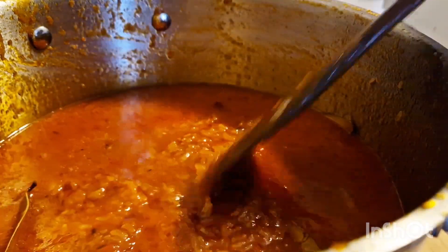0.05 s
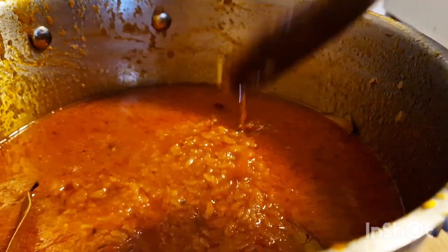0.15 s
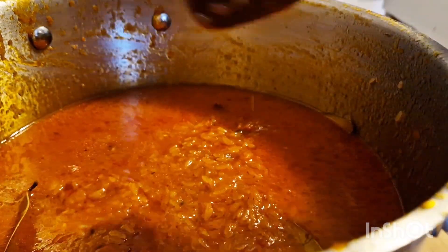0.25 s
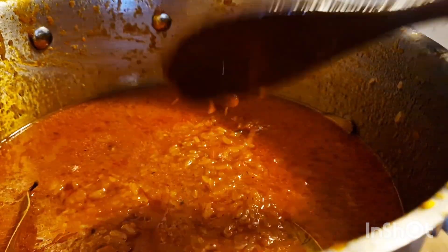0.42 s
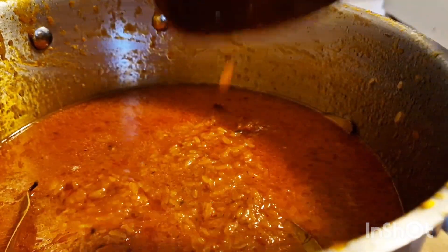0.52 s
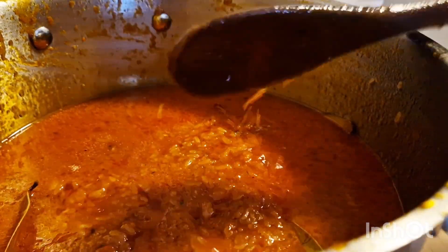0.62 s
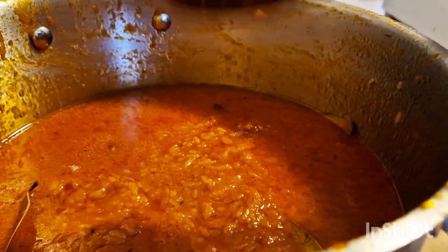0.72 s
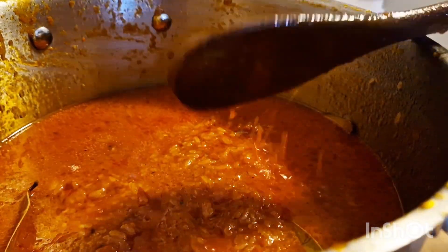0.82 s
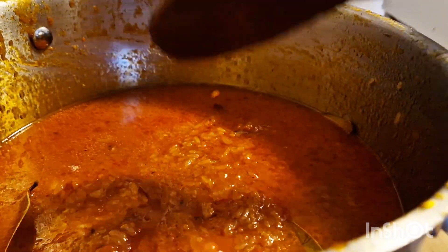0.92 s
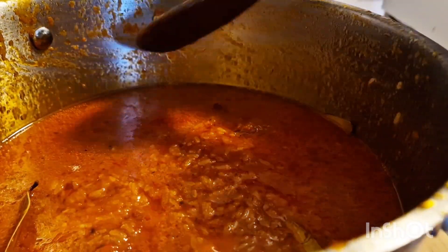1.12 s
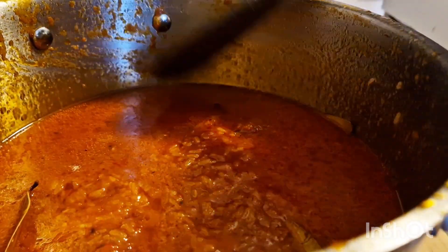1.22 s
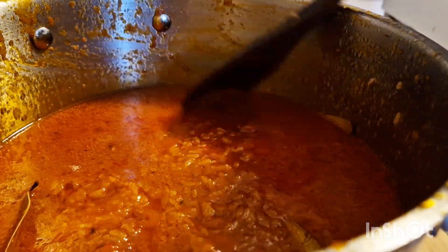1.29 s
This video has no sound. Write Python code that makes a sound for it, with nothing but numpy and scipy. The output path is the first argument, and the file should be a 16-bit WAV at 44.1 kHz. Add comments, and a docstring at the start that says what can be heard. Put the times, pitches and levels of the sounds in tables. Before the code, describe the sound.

Close stereo pickup in a small kitchen: three dry wood-on-steel clacks in quick succession, heavy and damped by the pot's wet contents, then near quiet with tiny bubbling plops, a brief gritty scrape and a dull bump.

```python
"""In a small kitchen, a wooden spoon knocks three times on the rim of a steel pot of wet rice, then bumps it softly.
Each knock is a dry clack and a short damped ring of decaying sines, a crack of shaped noise,
a thud of the full pot on the stove from slower-building modes, and a diffuse noise tail from the room.
Quiet plops of sauce are rising sines with noisy splats; sticky rice ticks are short bands of noise.
The spoon scrapes faintly along the wall as gritty noise, over a steady low-weighted kitchen hum."""
import sys
import numpy as np
from scipy import signal
from scipy.fft import rfft, irfft, next_fast_len
from scipy.io import wavfile
from scipy.ndimage import uniform_filter1d

SR = 44100
rng = np.random.default_rng(int(sys.argv[2]) if len(sys.argv) > 2 else 0)


def materialize(psi):
    """Save the field psi as 16-bit PCM at rate SR to the path in sys.argv[1].

    A 1-D psi becomes a single channel; in a 2-D psi each row is a channel.
    """
    bounded = np.clip(np.atleast_2d(psi).T, -1, 1)
    quanta = np.round(bounded * 32767).astype(np.int16)
    wavfile.write(sys.argv[1], SR, quanta)


N = 59535  # length in samples


def amp(db):
    """Decibels to gain."""
    return 10 ** (np.asarray(db) / 20)


def unit(x):
    """Scale to rms 1."""
    return x / np.sqrt(np.mean(x ** 2) + 1e-20)


def along(points, hz):
    """Read (Hz, value) points on a log frequency axis."""
    point_hz, value = np.transpose(points)
    return np.interp(np.log(hz + 1), np.log(point_hz + 1), value)


def clock():
    """Seconds at every sample."""
    return np.arange(N) / SR


def fade(t, t60_s):
    """Exponential decay by 60 dB in t60_s."""
    return np.exp(-np.log(1000) * t / t60_s)


def strike(t60_s, rise_s):
    """Envelope of a blow: an exponential build-up times an exponential decay."""
    return fade(clock(), t60_s) * (1 - np.exp(-clock() / rise_s))


def filtered(x, response):
    """Shape x by a gain that depends on frequency."""
    size = next_fast_len(N + SR // 2)  # padded so that the end does not wrap round
    hz = np.fft.rfftfreq(size, 1 / SR)
    return irfft(rfft(x, size) * response(hz), size)[..., :N]


def noise(spectrum, alike=((1000, 0),)):
    """Coloured stereo noise of rms 1; mid and side are balanced to give the left-right likeness."""
    def mid_side_gains(hz):
        turn = np.arccos(np.clip(along(alike, hz), -1, 1)) / 2
        return amp(along(spectrum, hz)) * [np.cos(turn), np.sin(turn)]

    mid, side = filtered(rng.standard_normal((2, N)), mid_side_gains)
    return unit(np.array([mid + side, mid - side]))


def band(centre_hz, width):
    """Stereo noise of rms 1 in one bell-shaped band, width in natural-log frequency."""
    def bell(hz):
        return np.exp(-.5 * (np.log((hz + 1) / centre_hz) / width) ** 2)

    return unit(filtered(rng.standard_normal((2, N)), bell))


def swing(modes, scatter_db):
    """Sum of damped sine modes, each with its own build-up and a random change of level."""
    total = 0
    for hz, db, t60_s, rise_s in modes:
        gain = amp(db + scatter_db * rng.normal())
        total = total + gain * strike(t60_s, rise_s) * np.sin(2 * np.pi * hz * clock())
    return total


def ring(modes, rise_s, scatter_db):
    """Damped modes that share one build-up time."""
    return swing([(*mode, rise_s) for mode in modes], scatter_db)


def add(out, start_s, x):
    """Mix x into out from start_s."""
    i = max(0, round(start_s * SR))
    out[..., i:] += x[..., :N - i]


def off_centre(x, lead_s):
    """The pot is nearer to the left microphone, so the right channel comes lead_s later."""
    return np.array([x, np.interp(clock() - lead_s, clock(), x, left=0)])


# the clack: the wooden spoon with the pot's quickly dying modes: pitch_hz, level_db, t60_s
CLACK = [(699, -39, 0.014), (1009, -16.5, .035), (1605, -2.5, 0.011), (1814, -14, 0.019),
         (2112, -16.5, 0.028), (2304, -9.5, 0.011), (3100, -34.5, 0.11), (3746, -27.5, .03)]
CLACK_RISE_S, SPOON_LEAD_S = 0.0014, 0.00013
# the steel wall, damped by the rice: pitch_hz, level_db, t60_s
WALL = [(533.5, -22.5, 0.11), (667, -34.5, 0.12), (709.6, -28, 0.17), (903, -32.5, 0.24), (971, -26, 0.15),
        (1078, -26.5, 0.23), (1110.6, -37.5, 0.25), (1254, -30.5, 0.079), (1606, -25.5, 0.22),
        (1870, -32.5, 0.139), (2020, -43, 0.166), (3050, -33, 0.091), (3700, -37, 0.083)]
WALL_RISE_S, WALL_LEAD_S, WALL_SCATTER_DB = .003, .00024, 1
# the steel rim at the point of contact: pitch_hz, level_db, t60_s
RIM = [(5140, -20, 0.017), (5560, -15.5, 0.018), (6086, -13, 0.012), (6514, -20.5, 0.017),
       (7466, -18.5, 0.0081)]
RIM_RISE_S, RIM_LEAD_S = 0.0004, 0.00012
# colour of the contact crack: frequency_hz, relative density_db (per Hz)
CRACK = [(400, 12), (1800, 0.5), (3300, 2), (4300, -11.5), (5300, 6), (6600, -4), (8000, -12), (10000, -30),
         (16000, -29.5)]
# stereo image of the crack: frequency_hz, left-right likeness (-1 to 1)
CRACK_ALIKE = [(1000, 0), (6000, 0.38)]
CRACK_DB, CRACK_T60_S, CRACK_RISE_S = -6.5, 0.011, 0.00046  # level against the rim
# near walls of the pot throw the crack back: level against the direct crack
SPLASH_DB, SPLASH_T60_S, SPLASH_RISE_S = 4, 0.01, 0.0035


def contact(clack_db, crack_db):
    """Wood meets steel: spoon and pot clack, the wall rings, the rim cracks and the crack scatters inside the
    pot."""
    clack = off_centre(ring(CLACK, CLACK_RISE_S, scatter_db=0.0), SPOON_LEAD_S)
    wall = off_centre(ring(WALL, WALL_RISE_S, WALL_SCATTER_DB), WALL_LEAD_S)
    direct = strike(CRACK_T60_S, CRACK_RISE_S)
    splash = amp(SPLASH_DB) * strike(SPLASH_T60_S, SPLASH_RISE_S)
    crack = noise(CRACK, CRACK_ALIKE) * (direct + splash)
    rim = off_centre(ring(RIM, RIM_RISE_S, scatter_db=3.5), RIM_LEAD_S)
    return amp(clack_db) * (clack + wall) + amp(crack_db) * (rim + amp(CRACK_DB) * crack)


# colour of the kitchen's answer: frequency_hz, relative density_db (per Hz)
ROOM = [(100, 10), (250, 5.5), (480, -0.5), (750, -3.5), (1080, 0.5), (1650, -3), (2200, -10),
        (2800, -17.5), (4200, -23), (5300, -15), (7200, -19), (9500, -29), (15500, -33)]
# how long the kitchen rings: frequency_hz, t60_s
ROOM_T60 = [(200, 0.37), (1200, .28), (3000, 0.29), (6500, 0.27), (12000, 0.23)]
# stereo image of the kitchen: frequency_hz, left-right likeness (-1 to 1)
ROOM_ALIKE = [(150, 0.78), (300, .5), (500, 0.52), (1000, -.15), (2500, 0.073), (9000, 0)]
ROOM_DB, ROOM_RISE_S = -16, 0.001


def kitchen():
    """The small room's diffuse tail: noise in which each frequency dies at its own speed."""
    hz, t, spectrogram = signal.stft(noise(ROOM, ROOM_ALIKE), SR, nperseg=256)
    decay = fade(t, along(ROOM_T60, hz)[:, None])
    tail = signal.istft(spectrogram * decay, SR)[1][:, :N]
    return amp(ROOM_DB) * tail * (1 - np.exp(-clock() / ROOM_RISE_S))


# the full pot on the stove: pitch_hz, level_db, t60_s, rise_s
BODY = [(69.2, -7.5, 0.44, 0.27), (90, -8.5, 0.33, 0.043), (147.1, -14.5, .19, 0.0023),
        (174.9, 2, 0.12, 0.046), (203, 3.5, 0.045, 0.0035), (193.2, -40.5, 0.85, 0.002),
        (244.2, -37.5, 0.11, 0.018), (259.8, -17, .125, .0017), (354.6, -4.5, 0.027, 0.00036),
        (405.4, -17.5, 0.17, 0.022), (472, -17.5, .09, 0.0004)]
BODY_LAG_S, BODY_PAN_DB = 0.0026, 0.07  # the thud trails the clack; pan is up left, down right


def thud():
    """The heavy pot moves on the stove in low modes, some of which build up slowly."""
    return amp([[BODY_PAN_DB], [-BODY_PAN_DB]]) * swing(BODY, scatter_db=1.2)


# knocks on the rim: start_s, level_db, clack_db and crack_db (both on top of the level)
KNOCKS = [(0.2031, -1.5, 4.5, -6.5), (.4290, -2.5, 3.5, -6), (0.6257, -3.38, 3.5, -0.5)]
ROOM_CHANGE = .3  # share of fresh tail against the shared one


def knocks():
    """Blows on one spot of the rim, so the room answers each almost alike."""
    out, shared_room = np.zeros((2, N)), kitchen()
    for start_s, level_db, clack_db, crack_db in KNOCKS:
        answer = (shared_room + ROOM_CHANGE * kitchen()) / np.hypot(1, ROOM_CHANGE)
        add(out, start_s, amp(level_db) * (contact(clack_db, crack_db) + answer))
        add(out, start_s + BODY_LAG_S, amp(level_db) * thud())
    return out


# soft bumps of the spoon on the wall: start_s, level_db, treble_db, crack_db (last two on top of the level)
BUMPS = [(1.118, -18.5, -18, 7), (1.1358, -31, -27.5, -9)]
# what a soft bump sets swinging: pitch_hz, level_db, t60_s, rise_s
SWAY = [(80.8, -5.5, .33, 0.0072), (91.6, -6, 0.33, 0.0038), (125, 5, 0.058, 0.007),
        (202.4, -8, 0.25, 0.0087), (457, -11, 0.1, 0.006), (713, -16, 0.041, 0.0044),
        (1604, -20.5, 0.086, 0.00047)]
BUMP_ROOM_DB = 4  # lift of the kitchen tail


def bumps():
    """The spoon lands softly and rebounds, with dulled treble; the pot sways from the first touch."""
    out = np.zeros((2, N))
    for start_s, level_db, treble_db, crack_db in BUMPS:
        touch = contact(clack_db=5.5, crack_db=crack_db) + amp(BUMP_ROOM_DB) * kitchen()
        tone = [(700, 0.0051), (3000, treble_db)]  # Hz, dB
        dulled = filtered(touch, lambda hz: amp(along(tone, hz)))
        add(out, start_s, amp(level_db) * dulled)
    first_s, first_db = BUMPS[0][:2]
    add(out, first_s, amp(first_db) * swing(SWAY, scatter_db=.5))
    return out


# plops of the sauce: start_s, level_db, pitch_hz (at the start of the rise)
PLOPS = [(.002, -39, 733), (0.0831, -38.5, 420), (0.169, -43, 530), (.177, -24.5, 573),
         (0.786, -39.5, 1000), (0.921, -40, 1065), (.996, -47, 677), (.998, -46.5, 1217),
         (1.075, -48, 1020), (1.23, -45.5, 637), (1.236, -51, 1510), (1.243, -44.5, 1060),
         (1.320, -41.5, 650), (1.341, -40, 450)]
PLOP_T60_S, PLOP_RISE_S = .024, .001
PLOP_BEND_PER_S = 6  # the pitch climbs by twice this share of itself per second
SPLAT_DB, PLOP_ROOM_DB = -7, -18  # against the plop's level


def plops():
    """Thick bubbles burst with a short rising note, a wet splat and a faint tail in the same band."""
    out, t = np.zeros((2, N)), clock()
    for start_s, level_db, pitch_hz in PLOPS:
        note = np.sin(2 * np.pi * pitch_hz * t * (1 + PLOP_BEND_PER_S * t))
        splat = amp(SPLAT_DB) * band(pitch_hz, width=.35)
        plop = (note + splat) * strike(PLOP_T60_S, PLOP_RISE_S)
        tail = amp(PLOP_ROOM_DB) * band(pitch_hz, width=.3) * strike(t60_s=.2, rise_s=.004)
        add(out, start_s, amp(level_db) * (plop + tail))
    return out


# sticky ticks of rice: start_s, level_db, pitch_hz (band centre)
TICKS = [(1.0612, -50.5, 6900), (1.063, -53, 3600), (1.271, -60, 10700), (1.281, -55, 3920),
         (1.294, -55.5, 8200)]


def ticks():
    """Grains unstick with tiny bursts of narrow-band noise."""
    out = np.zeros((2, N))
    for start_s, level_db, pitch_hz in TICKS:
        tick = band(pitch_hz, width=.15) * strike(t60_s=0.041, rise_s=.001)
        add(out, start_s, amp(level_db) * tick)
    return out


# strength of the slide along the wall: time_s, level_db (before the grain)
SCRAPE = [(1.015, -98), (1.028, -58), (1.065, -56.5), (1.11, -54.5), (1.145, -47.5), (1.18, -113),
          (1.22, -109)]
# colour of the friction: frequency_hz, relative density_db (per Hz)
GRIT = [(500, 14.5), (1500, 0.5), (2600, -4.5), (3600, -1), (4500, -4.5), (5600, 0.5), (7500, 1),
        (9500, -14.5), (15000, -17)]
GRAIN_DB = 2.5  # rms flutter of the level
JUDDER_HZ, JUDDER_DB, JUDDER_START_S, JUDDER_LENGTH_S = 190, -43, 1.022, .052


def scrape():
    """Gritty friction of wood on steel, with a brief low judder as the spoon starts to slide."""
    t = clock()
    grain = unit(uniform_filter1d(rng.standard_normal(N), size=120))
    level_db = np.interp(t, *np.transpose(SCRAPE)) + GRAIN_DB * grain
    grit = noise(GRIT) * amp(level_db)
    progress = np.clip((t - JUDDER_START_S) / JUDDER_LENGTH_S, 0, 1)
    stroke = np.abs(np.sin(np.pi * progress)) ** .5
    judder = np.sin(2 * np.pi * JUDDER_HZ * t) + band(JUDDER_HZ, width=0.17)
    return grit + amp(JUDDER_DB) * stroke * judder


# colour of the kitchen background: frequency_hz, relative density_db (per Hz)
HUM = [(25, -20), (45, -9.5), (78, 7.5), (115, -4.5), (160, -13), (210, -12.5), (300, -17), (500, -19),
       (1000, -27), (1500, -28.5), (2700, -34.5), (4200, -38), (5600, -35.5), (7500, -34), (10500, -48.5),
       (16000, -60)]
# stereo image of the background: frequency_hz, left-right likeness (-1 to 1)
HUM_ALIKE = [(100, 0.96), (500, 0.88), (2000, 0.16), (8000, 0.19)]
HUM_DB = -51


def hum():
    """Steady kitchen background: noise weighted to the lows, nearly mono in the bass."""
    return amp(HUM_DB) * noise(HUM, HUM_ALIKE)


def scene():
    """All layers summed and leaned slightly to the left."""
    mix = knocks() + bumps() + plops() + ticks() + scrape() + hum()
    return mix * amp([[.5], [-.5]])


LOW_CUT_HZ, TOP_HZ = 67, 16000


def record(dry):
    """The recorder cuts the deepest bass, rounds off the highest peaks and keeps nothing above its band limit."""
    thin = filtered(dry, lambda hz: hz ** 2 / np.hypot(hz ** 2, LOW_CUT_HZ ** 2))
    rounded = thin / (1 + np.abs(thin) ** 8) ** (1 / 8)
    return filtered(rounded, lambda hz: hz < TOP_HZ)


dry = scene()
out = record(dry)
materialize(out)
```